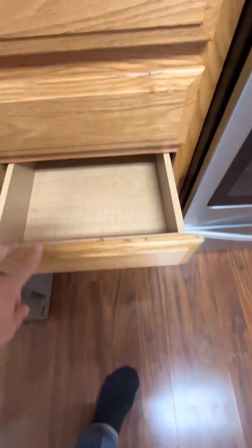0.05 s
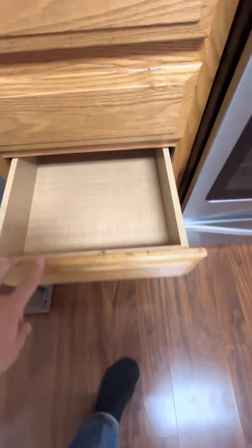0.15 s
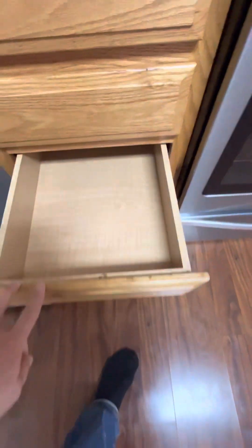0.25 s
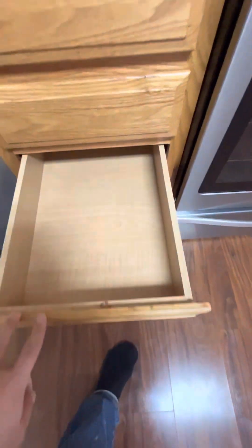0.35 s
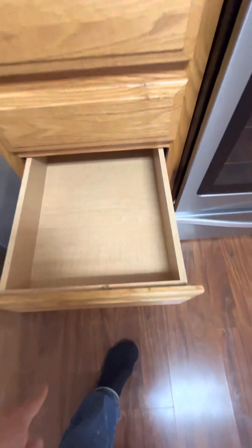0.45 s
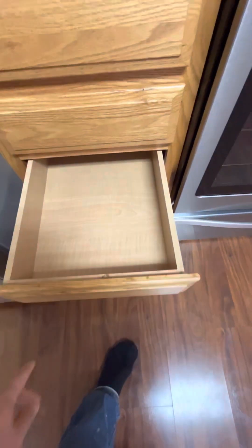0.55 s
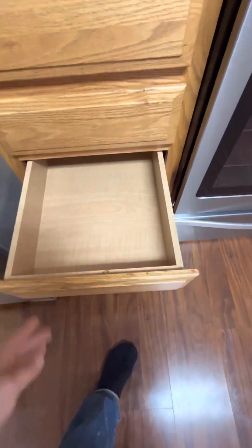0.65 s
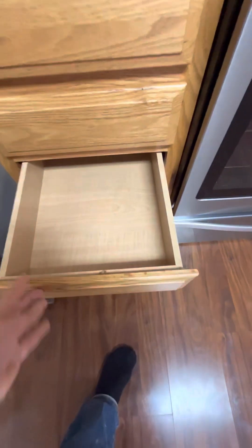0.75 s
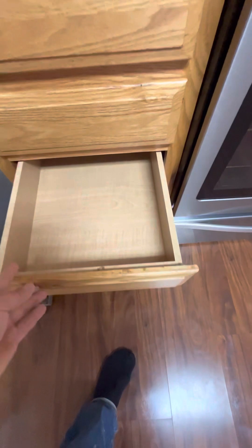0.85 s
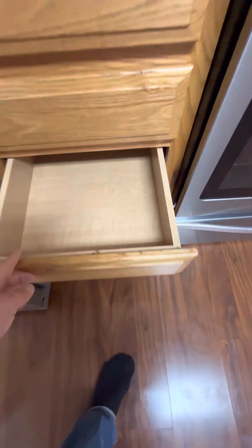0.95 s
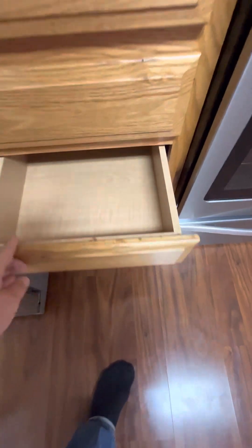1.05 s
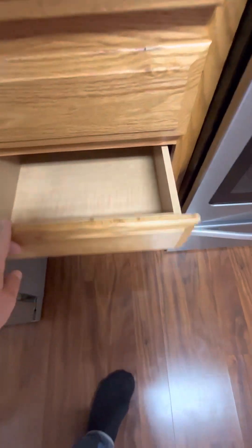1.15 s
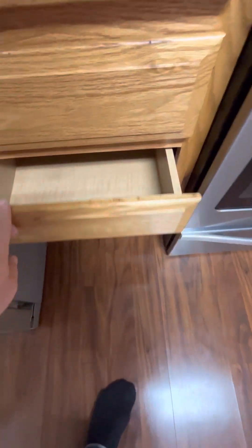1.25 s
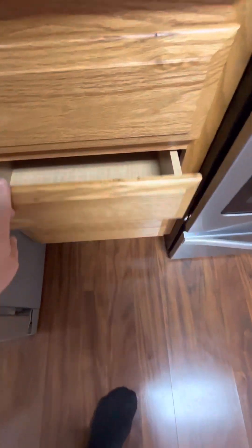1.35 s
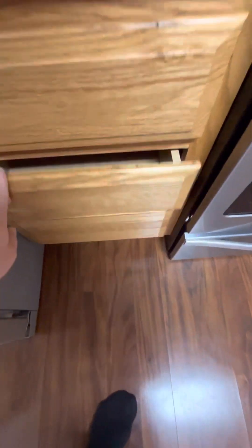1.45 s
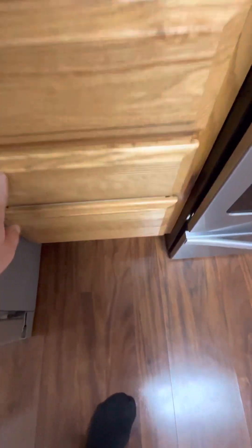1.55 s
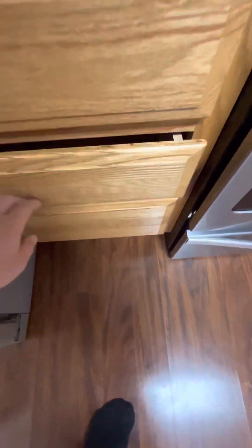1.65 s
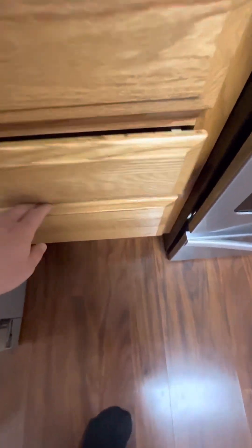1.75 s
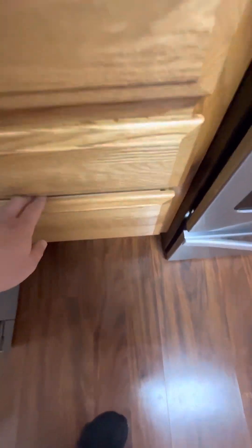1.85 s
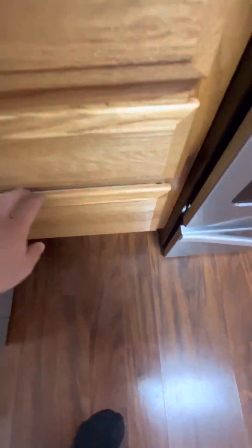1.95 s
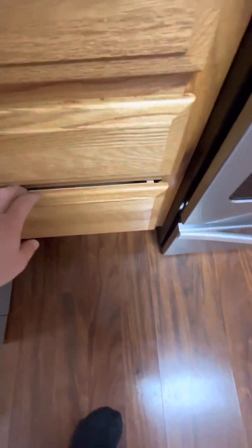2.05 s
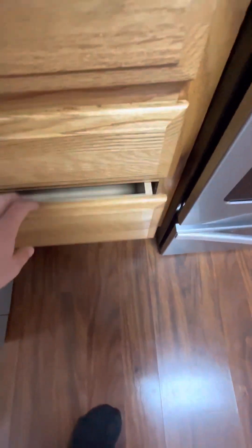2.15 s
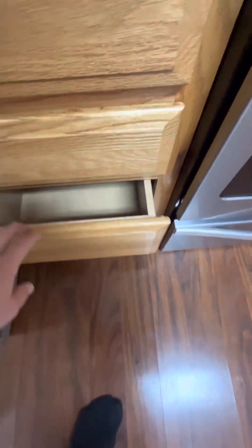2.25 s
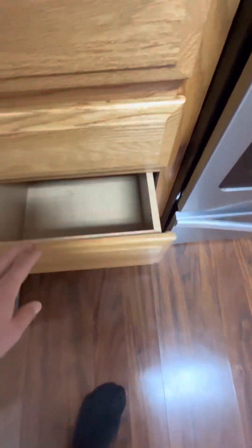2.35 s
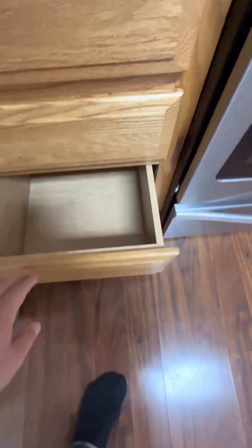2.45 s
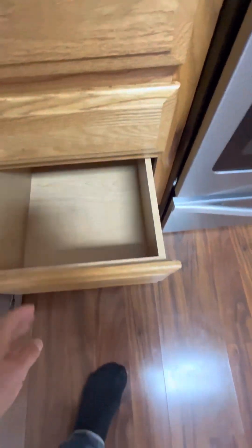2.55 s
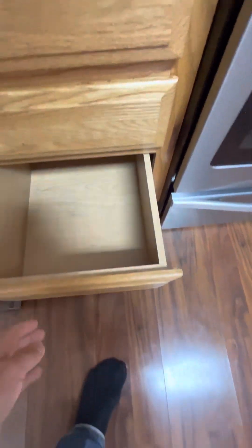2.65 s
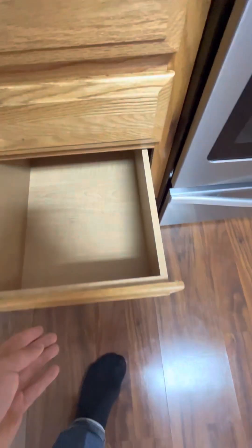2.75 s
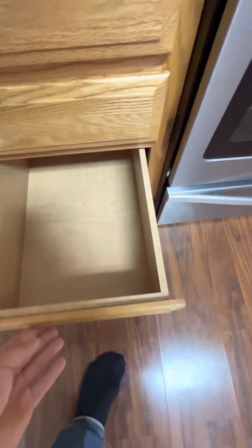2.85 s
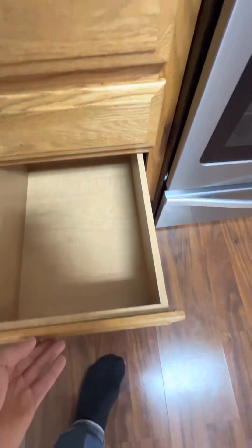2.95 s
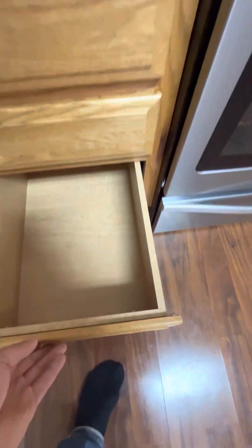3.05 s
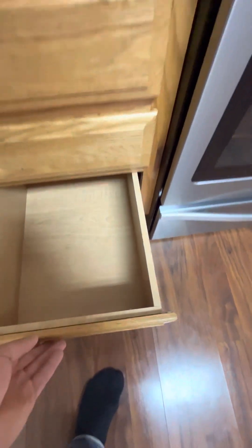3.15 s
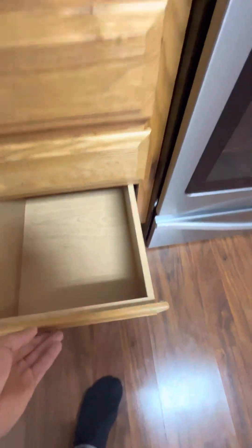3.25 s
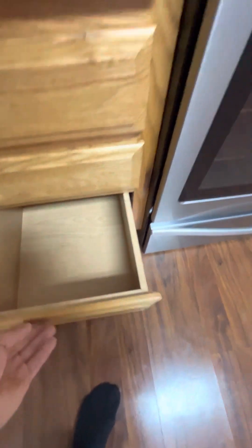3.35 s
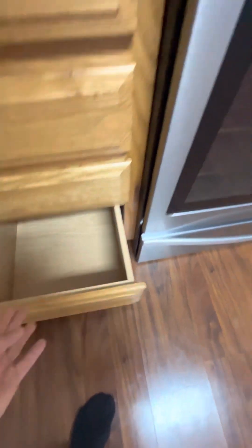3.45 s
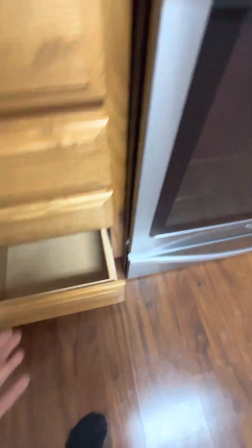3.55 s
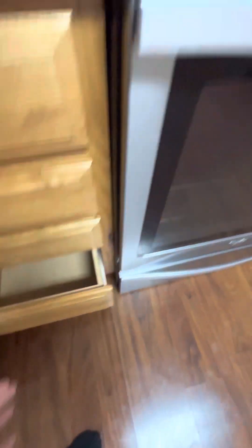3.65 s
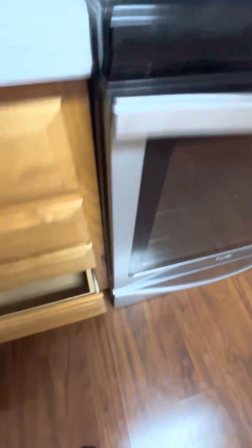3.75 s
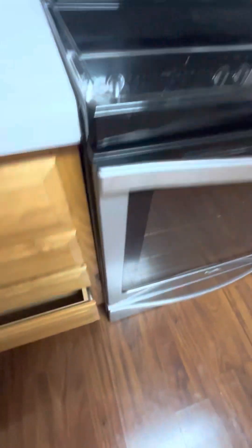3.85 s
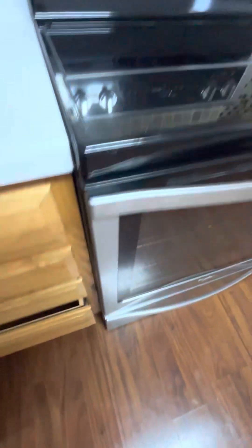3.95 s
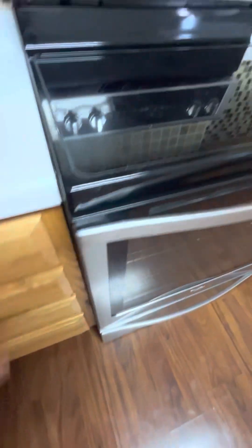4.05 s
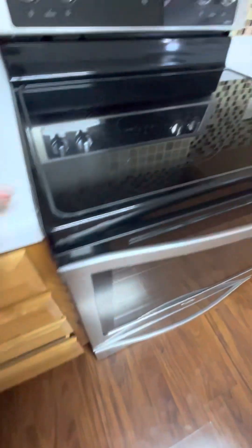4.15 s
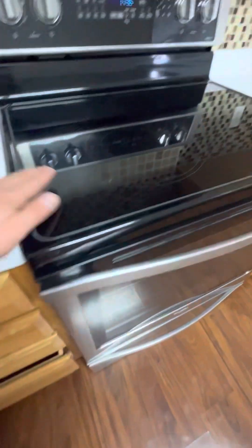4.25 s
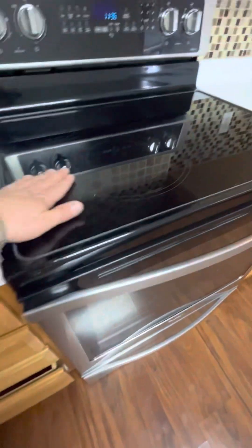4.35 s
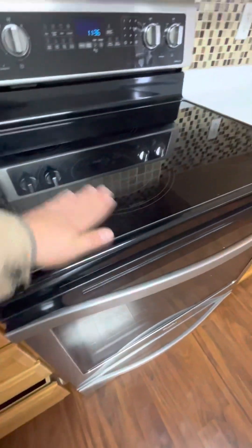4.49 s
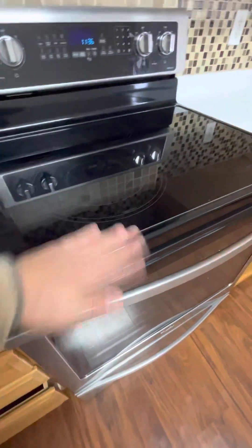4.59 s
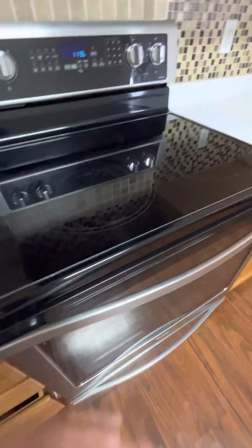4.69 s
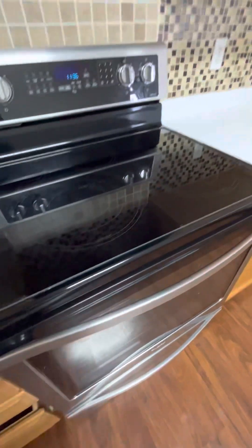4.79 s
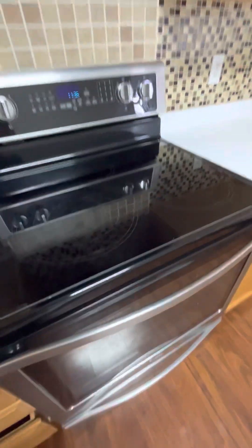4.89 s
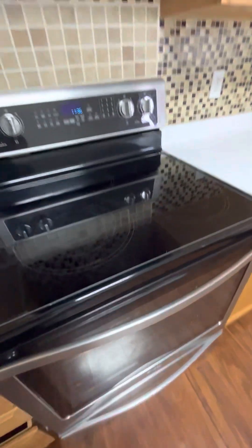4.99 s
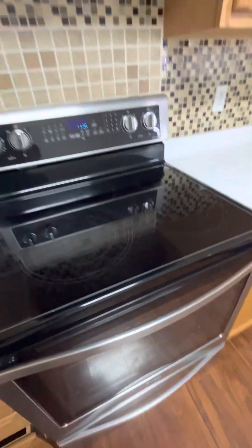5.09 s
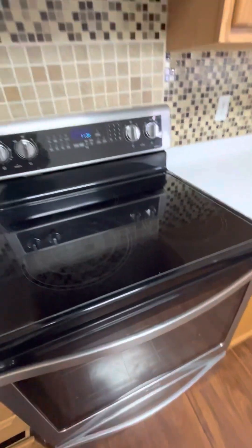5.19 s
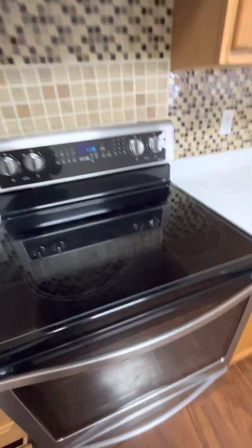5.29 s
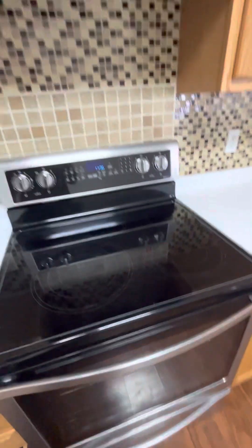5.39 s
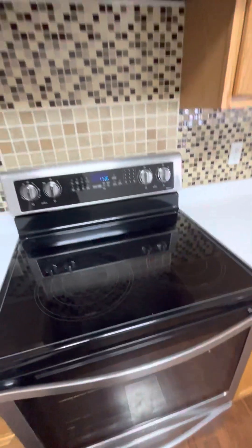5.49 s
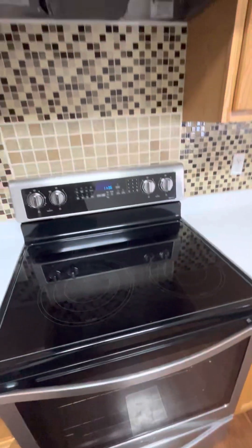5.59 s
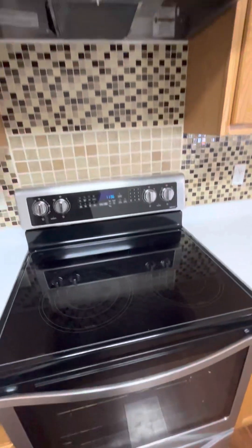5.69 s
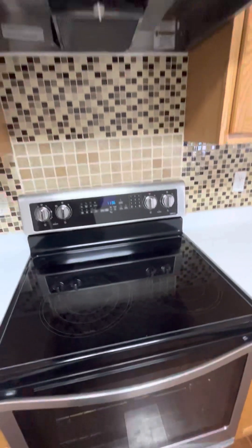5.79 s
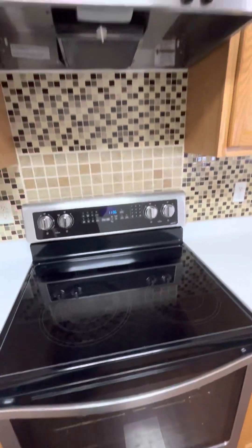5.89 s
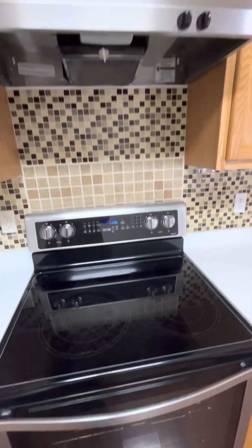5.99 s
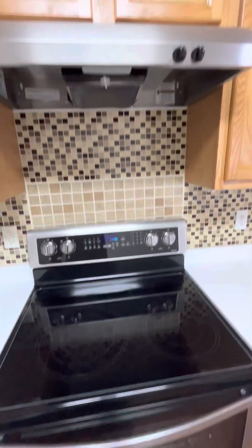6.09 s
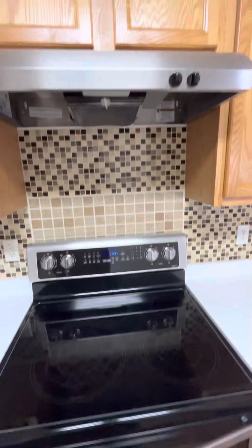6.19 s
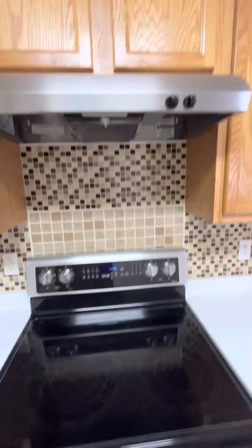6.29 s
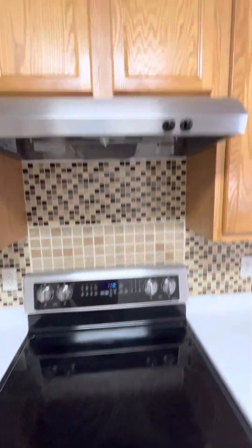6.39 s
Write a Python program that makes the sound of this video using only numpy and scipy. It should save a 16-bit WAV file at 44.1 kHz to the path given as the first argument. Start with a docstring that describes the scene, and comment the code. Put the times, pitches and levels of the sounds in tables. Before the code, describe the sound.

Close drawer rumble on rollers, a hard bang, clattering and a heavy slam, then a softer drawer roll, a soft bump and quiet kitchen.

```python
"""Two wooden kitchen drawers on roller runners are pulled out and pushed shut, close by.
The upper one bangs into its end stop, rattles and is slammed; the lower one is tugged open and rolls gently home.
A soft bump and some rustle follow in the quiet kitchen, and at the end the room tone rises briefly.
Rolling is filtered noise and a hum, impacts are dying noise clouds and damped modes;
room reflections and a hollow cupboard prolong them, and two microphone ports receive the whole."""
import sys
import numpy as np
from scipy import signal
from scipy.fft import rfft, irfft, next_fast_len
from scipy.io import wavfile
from scipy.ndimage import uniform_filter1d

SR = 44100
rng = np.random.default_rng(int(sys.argv[2]) if len(sys.argv) > 2 else 0)


def generate_wav(sig):
    """Save sig (samples, or channels by samples) to the path in sys.argv[1] as 16-bit PCM at SR."""
    pcm = np.round(np.clip(np.atleast_2d(sig).T, -1, 1) * 32767).astype(np.int16)
    wavfile.write(sys.argv[1], SR, pcm)


N = 283563
TIME = np.arange(N) / SR

# Strokes of each drawer, moved by a hand and then coasting: start_s, gather_speed_s, let_go_s, halt_s,
# slowing_db_per_s, box_rumble_db, roller_whirr_db, track_hiss_db
UPPER_STROKES = [(-.12, 0.11, 0.16, 0.5, 27.5, -32, -35, -44), (.37, 0.13, 0.67, 1.0, 24.5, -29, -35, -40),
                 (.99, 0.059, 1.42, 1.54, 36, -36, -41.5, -50.5)]
LOWER_STROKES = [(2.12, 0.13, 2.683, 3.1, 58, -39.5, -43, -52),
                 (3.07, 0.23, 3.33, 4.05, 14.2, -39.5, -41.5, -51)]
# Exponents of speed: rumble, whirr, hiss [no unit]
SPEED_POWERS = (0.67, 1, 1.16)
STOP_S = 0.025  # duration of a drawer's halt and of a hum's fade
# Hum of the rollers, one list a run: time_s, pitch_hz, level_db (relative to HUM_DB)
ROLLER_HUMS = [
    [(0.0, 296, -34), (0.04, 285, -23), (0.064, 278.5, -43), (0.086, 278.7, -24.5), (0.242, 302, -42),
     (0.274, 278.5, -25), (0.304, 277, -34), (0.34, 292, -37)],
    [(1.0, 292, -46), (1.104, 320.2, -24.5), (1.222, 293.4, -43), (1.262, 276, -25.5), (1.286, 282.7, -65),
     (1.394, 306.5, -30.5), (1.456, 284, -42), (1.52, 281.3, -25)],
    [(2.2, 313.7, -35.5), (2.404, 278.4, -39.5), (2.488, 311.4, -50), (2.604, 273.2, -35),
     (2.628, 271, -51), (2.642, 262.6, -35.5), (2.766, 275.5, -39), (2.88, 267, -51)],
    [(3.13, 265.4, -57), (3.19, 262.7, -45), (3.436, 314.8, -36.5), (3.506, 284, -51), (3.622, 314, -35),
     (3.846, 274, -48.5), (3.898, 340, -34), (4.02, 276.4, -54)],
]
HUM_DB = -7
HUM_WANDER_PER_S, HUM_WANDER_DB = 140, 0.8  # rate and depth of the pitch wander
BUMPS_PER_S, BUMPS_DB = 45, 1.8  # unevenness of the track
WHIRR_PATCHY_DB = 2.5
# Specks in the track: rate, level against the hiss, die-away time, spread of sizes
GRIT_PER_S, GRIT_DB, GRIT_DIE_S, GRIT_SPREAD_DB = 80, -1, 0.0018, 3.5

# Thin side walls clacking against the frame: start_s, level_db, centre_pitch_hz
CLACKS = [(.265, -28, 830), (0.274, -34.5, 940), (.397, -24, 1100), (.412, -24, 800), (.427, -26, 1300),
          (.516, -31, 1140), (.596, -29, 1200), (.604, -33, 1050), (.667, -37.5, 1160), (0.721, -31, 1080),
          (.768, -27, 1225), (.818, -29, 1330), (.912, -37, 1370), (1.024, -40.5, 1160), (1.379, -35, 1300),
          (1.396, -35.5, 715), (1.412, -46.5, 1370), (1.623, -36, 600), (1.638, -34, 530), (1.68, -34, 580),
          (1.727, -41, 1350), (1.736, -38.5, 540), (1.834, -27.5, 716), (2.043, -37, 1560),
          (2.144, -36.5, 950), (2.379, -37, 720), (2.471, -39, 754), (2.585, -38.5, 1550),
          (2.767, -37, 1620), (2.781, -48, 1520), (3.386, -42, 1350), (3.482, -49, 1610),
          (4.068, -35.5, 1070), (4.072, -39, 1500)]
CLACK_SPREAD_OCTAVES, CLACK_RISE_S = 0.25, 0.0007  # reach across the modes, speed of onset
# Cabinet or floor swinging under a blow: start_s, level_db, pitch_hz, time_to_peak_s,
# carcass_db (relative to the swing)
THUMPS = [(.28, -23.5, 89.4, 0.02, -0.5), (.367, -7, 105, 0.0093, -20), (.376, -24, 204, 0.0088, -8),
          (0.434, -21.5, 234.5, 0.012, -29), (1.378, -19, 93, 0.01, -9.5), (1.555, -6, 77, 0.0091, -4.5),
          (1.5425, -16, 265.6, .004, -19), (1.553, -16, 219, 0.0062, -34), (1.599, -18.5, 277, .016, -29),
          (1.617, -25, 288, .011, -28), (1.832, -26, 280, .012, 0), (1.851, -14.5, 70, 0.018, -1.5),
          (1.924, -26, 270, .012, -15), (1.91, -20, 93, 0.02, -7), (2.127, -26, 76, 0.015, -17),
          (2.228, -26.5, 53.7, 0.038, -21), (2.235, -25, 91, 0.025, -20), (2.393, -24.5, 76.5, 0.005, -12),
          (2.586, -25, 82, 0.0081, -30), (3.859, -31, 57, 0.048, -16), (4.049, -22, 77.7, 0.023, -30),
          (4.053, -26.5, 161.4, 0.0208, -28), (4.056, -27.5, 195, 0.015, -27),
          (4.313, -33.5, 96.5, 0.012, -11), (4.506, -44, 69.9, 0.019, -12), (4.575, -28.5, 80, 0.022, -24)]
WANDER_PER_S, CARCASS_WANDER_DB = 90, 0.4  # loose drawers detune the ringing carcass
# Wood striking wood: start_s, level_db, brightness_db_per_octave, die_away_s,
# panel_ring_db (relative to the blow), opening (0 shut to 1 open)
KNOCKS = [(0.356, -22.5, 9.5, 0.012, -18.5, 0.1), (0.3624, -1.5, 0, 0.0038, -20, 0.77),
          (.371, -6, -8, 0.027, -28, 0.3), (0.386, -16, 7.5, 0.0083, -17.5, 0),
          (0.4044, -18, 0.5, 0.005, -15, .5), (0.4178, -26.5, 3, 0.0046, -22, 0.5),
          (0.423, -20, -1, 0.0044, -27, 0.3), (0.4321, -22, 4, 0.0035, -18.5, 0.5),
          (0.472, -29.5, 9.5, 0.0041, -12, 0.5), (0.477, -27, 0.5, 0.0014, -18, 0.3),
          (0.586, -22, -4.5, 0.026, -4, 0.6), (.767, -24, -5.5, 0.0085, -23, 0.5),
          (1.531, -25, 1, 0.0077, -5.5, 0.3), (1.542, -5, 5, 0.0026, -3, 0.04),
          (1.556, -18.5, -1.5, 0.021, -29, 0.26), (1.599, -17, -9, 0.01, -36, 0),
          (1.831, -20, -9, 0.015, -22, 0.2), (1.865, -24.5, -5, 0.039, -1, 0.56),
          (2.14, -28.5, -7, 0.018, -18, 0.6), (4.044, -33, -6, 0.025, -22, 1),
          (4.0696, -25.5, -5.5, 0.0096, -19, 0.34), (4.505, -32.5, -19, 0.01, -25, 0.3),
          (4.586, -27, -9, 0.019, -10, 0.5)]
# Loose drawer scraping and chattering on its runners: start_s, level_db, length_s,
# brightness_db_per_octave, brokenness (0 smooth to 1 broken)
RATTLES = [(0.379, -23.5, 0.068, 0.5, 0.5), (0.41, -31.5, 0.04, 16.5, 0.48), (0.459, -34.5, 0.041, 2, 0.91),
           (0.575, -29.5, 0.034, 1.5, 0.78), (1.548, -33, 0.068, 4, 0.88), (1.838, -27, 0.071, 1, 0.13),
           (2.507, -39.5, 0.054, -2.5, 0.43), (2.551, -38, 0.058, -5, 0.53),
           (2.759, -44, 0.038, -3.5, 0.76), (4.557, -37, 0.051, -6.5, 0.52)]
# Collisions in a rattle: rate, decay as a share of the gap, spread of sizes either way
CHATTER_PER_S, CHATTER_DIE, CHATTER_SPREAD_DB = 170, 0.32, 5
RUB_PATCHY_DB = 2.5
# Upper drawer, thrown back from its end stop, rocking on its runners:
# start_s, level_db, brightness_db_per_octave, strongest_note_hz
ROCKS = [(.507, -16, 3.5, 3320), (0.5571, -19, 3, 5170), (0.6547, -22.5, 5, 2980),
         (0.7004, -24.5, 0.5, 5530), (0.7673, -26.5, 0.5, 1300), (0.814, -23, -2, 1430),
         (0.8511, -32, 4, 3260), (0.8924, -29, 1, 5150), (0.953, -33, -4.5, 3100), (1.0142, -31, -4, 1420),
         (1.0624, -42, -1, 1260)]
ROCK_SWING_DB, ROCK_SWING_FADE_DB_PER_S = -19.5, 44  # level of the first swing, and its steady decline
ROCK_LAG_S, ROCK_HZ, ROCK_RISE_S, ROCK_CARCASS_DB = 0.0073, 84, 0.016, -26
# Rollers clicking over track joints: start_s, level_db, brightness_db_per_octave, strongest_note_hz
CLICKS = [(.883, -38, 2, 3300), (.912, -38, -4, 1314), (1.178, -44, -3, 3330), (1.197, -49, -19, 1400),
          (1.2374, -30, 0.5, 3600), (1.3357, -43, 2, 3500), (1.3683, -30, 3, 2600), (1.438, -55, 2, 3041),
          (2.04, -33, -2, 1560), (2.1296, -31, -1, 2940), (2.379, -37.5, -3, 2860),
          (2.4443, -41, -0.5, 2720), (2.4693, -31.5, -2, 2080), (2.533, -38, 23, 3100),
          (2.5156, -46, -2, 3060), (2.5665, -33, -2.5, 2800), (2.587, -32, -3, 3070),
          (2.6608, -57, 0, 3000), (2.7092, -44, -3, 1608), (2.7625, -28.5, -2, 3620),
          (3.2799, -40.5, 2, 4940), (3.293, -43, -2, 4650), (3.3553, -33, -2.5, 4360),
          (3.389, -44, -1, 2980), (3.4795, -32, -1, 1620), (3.551, -49, -3, 3010), (3.579, -43, -1.5, 3520),
          (3.797, -44.5, 1, 6200), (3.845, -46.5, 0, 2850), (3.89, -50.5, 3, 2800)]
# Small contacts of hand and sleeve: start_s, level_db, brightness_db_per_octave, strongest_note_hz
TICKS = [(4.121, -37.5, -1.5, 4140), (4.571, -29, 1.5, 2860), (4.6937, -41, 13, 9000),
         (5.077, -50, -7, 1300), (5.104, -50.5, 10, 9400), (5.166, -50, -2, 2600),
         (6.0906, -44.5, -3, 1730)]
ROCK_DIE_S, CLICK_DIE_S, TICK_DIE_S = 0.0075, 0.01, 0.0034  # time constants of the contacts
# Resonances of a point of contact: frequency range, width, greatest height
SPOT_LOW_HZ, SPOT_HIGH_HZ, SPOT_WIDTH_HZ, SPOT_DB = 800, 9000, 55, 9
# Smooth swells of low rumble and soft rustle: movements of the person, and at the end
# a rise of the room tone: middle_s, half_length_s, rumble_db, rustle_db
SWELLS = [(2.987, 0.76, -65, -63.5), (4.227, 0.17, -46.5, -56.5), (4.567, 0.091, -40.5, -53),
          (4.88, 0.25, -49.5, -57), (5.203, 0.059, -66, -65), (6.363, 0.14, -59, -65)]
RUSTLE_PATCHY_DB = 2.5
# Hum and hiss of the still room: time_s, level_db
STILL_DB = [(5.3, -55.5), (5.95, -59.5), (6.25, -55.5)]

# Damped modes of drawer front, cabinet carcass, drawer side walls and hollow cupboard:
# pitch_hz, level_db, t60_s
PANEL = [(695, -12.5, .05), (798, 2, 0.043), (854, -11, 0.12), (1105, -18.5, 0.0082), (2114, -6, 0.024),
         (2410, -17.5, .035), (2776, -9, 0.045), (3100, -20.5, 0.017), (3500, -1.5, 0.0023),
         (3750, -1.5, .025), (4500, -6.5, 0.038), (4500, -8, 0.025), (5280, -7.5, 0.12)]
CARCASS = [(43.8, -13, 1), (68, -30.5, 0.31), (85.4, -8, 0.61), (131, -8.5, 0.23), (195, -3, 0.13),
           (258, -4.5, 0.26), (282.5, 1.5, 0.089), (336.6, -13, 0.22), (476, -14, 0.35), (541, -14.5, 0.32),
           (738, -15.5, 0.15)]
SIDES = [(530, 0.5, .09), (625, -1.5, .06), (704, -5, .07), (833, 1, .06), (938, -0.5, 0.087),
         (1077, -1, .07), (1230, -2, .06), (1271, -5, 0.073), (1368, -1, 0.062), (1430, -3.5, .05),
         (1593, 0, .08), (1720, -6, 0.031)]
CUPBOARD = [(416, -2, 0.45), (479, 1.5, .55), (534, -0.5, 0.72), (717, -1, 0.5), (795, 3, .5),
            (924, 1.5, 0.65), (1077, -3.5, .5), (1197, -10, 0.41), (1287, -8.5, .45), (1374, 0, 0.46),
            (2230, 1.5, .4), (2634, 0.5, 0.49), (2742, -4.5, .45), (2790, 2.5, .45), (3043, -8, .35)]
# Resonances of the two drawer boxes and of their steel tracks: pitch_hz, width_hz, height_db
UPPER_BOX = [(99, 27, 10.5), (253, 130, 11), (293, 3.5, -10), (336.6, 34, 8), (487, 42, 7.5),
             (566, 35, 8.5), (816, 17, 14.5), (946, 8.7, 5), (1193, 39, 8), (1334, 48, 9.5),
             (2035, 60, 7.5), (2820, 110, 10), (3090, 210, 7.5), (3894, 140, 6.5), (5040, 130, 4.5)]
LOWER_BOX = [(92.4, 27, 10.6), (240, 27, 7.7), (455, 16, 8.3), (614, 155, 6.7), (725, 38, 8.2),
             (867, 16, 6.5), (1352, 34, 9.9), (1560, 120, 4), (2760, 370, 6.2), (3050, 200, 5.5),
             (4100, 170, 4.5)]
UPPER_TRACK = [(3030, 90, -0.5), (3840, 250, -1), (3980, 70, 6.5), (4810, 90, 3.5), (5400, 600, 4),
               (5630, 70, 4.5), (7740, 320, 4.5)]
LOWER_TRACK = [(2330, 120, 2.1), (2740, 230, 2.3), (3670, 210, 0.67), (4020, 41, 2.4), (4360, 98, 4),
               (4870, 100, 2.9), (5950, 65, 1.6)]
# Relative noise spectra of each source: frequency_hz, density_db
WOOD = [(60, 3), (200, -4.5), (400, -1), (800, 0.5), (1400, -2), (2100, -7.5), (3200, -2), (4500, -10.5),
        (6500, -16), (9000, -25.5), (13000, -40)]
RUNNER = [(100, 11), (500, 7.5), (900, 1.5), (1450, 6), (2200, 1.5), (3200, 10.5), (4200, 6), (5500, 3),
          (7000, 5.5), (9000, -6), (13000, -20)]
RUMBLE = [(25, -57), (50, 4), (90, 0.5), (160, -1.5), (300, -6.5), (420, -11.5), (700, -53)]
WHIRR = [(200, -17.5), (420, -2.5), (700, -4), (1000, -7), (1400, -12.5), (2200, -21), (5000, -53.5)]
HISS = [(700, -25.5), (1600, 11.5), (2200, 6.5), (3200, 11), (4200, 9.5), (5500, 8.5), (7000, 5),
        (9000, -6.5), (13000, -18.5)]
LOW_RUMBLE = [(25, 3.5), (50, 1.5), (85, -1.5), (150, -16.5), (300, -14), (700, -21), (1500, -29.5),
              (4000, -49)]
STILL = [(25, -8), (50, -1), (100, 6.5), (180, -1), (300, 5), (450, -6), (660, -7.5), (780, 1), (900, -8),
         (2000, -14.5), (5500, -14), (8000, -19.5), (13000, -34)]
# Reverberation time of the kitchen: frequency_hz, t60_s
ROOM = [(60, 0.93), (180, 0.71), (400, 1), (800, 0.43), (1300, 0.92), (3000, 0.71), (7000, 0.5),
        (13000, 0.44)]
PANEL_ECHO_DB = -17  # little of the panel's note reaches the room
EVEN_HZ, ROOM_EVEN_HZ = 200, 30  # bandwidths over which a contact and the room are even
# Likeness of noise at the two microphone ports: frequency_hz, likeness (0 to 1)
LIKENESS = [(200, 1), (320, .98), (550, .6), (850, .33), (1500, .35), (3000, .45), (6000, .78), (8000, .88),
            (13000, .92)]
# Level of the left port over the right: frequency_hz, difference_db
LEAN = [(150, 0), (300, 1), (550, 3.5), (820, 9.5), (1250, 8.5), (1800, 3), (2700, -1), (6000, -.7),
        (13000, 0)]
# Phase lead of the left port over the right: frequency_hz, lead_radians
LEAD = [(130, 0), (300, -.1), (600, 0), (1250, -1), (2700, -1.7), (4000, -2.3), (6300, -3.0), (8500, -1.8),
        (11500, -.7)]
EDGE_HZ = 13900  # upper band limit


def amp(db):
    """Logarithmic level: converts decibels to an amplitude ratio."""
    return 10 ** (np.asarray(db) / 20)


def unit(x):
    """Power normalisation: scales to rms 1."""
    return x / np.sqrt(np.mean(x ** 2) + 1e-20)


def read(points, hz):
    """Logarithmic pitch scale: interpolates a table along log frequency."""
    f, value = np.transpose(points)
    return np.interp(np.log(hz + 1), np.log(f), value)


def add(mix, s, sound):
    """Superposition: sums a sound into the mix from time s."""
    part = mix[:, max(round(s * SR), 0):][:, :sound.shape[-1]]
    part += sound[..., :part.shape[1]]


def noise(size):
    """Partial coherence: white noise shared by the two ports according to LIKENESS."""
    padded = next_fast_len(size)
    left, other = rfft(rng.standard_normal((2, padded)))
    same = np.clip(read(LIKENESS, np.linspace(0, SR / 2, len(left))), 0, 1)
    right = same * left + np.sqrt(1 - same ** 2) * other
    return irfft(np.array([left, right]), padded)[:, :size]


def colour(x, spectrum, tilt_db=0, peaks=(), size=4096):
    """Minimum-phase filtering: unit-power taps from a spectrum, a tilt per octave and resonances."""
    hz = np.fft.rfftfreq(size, 1 / SR)
    db = read(spectrum, hz) + tilt_db * np.log2(np.maximum(hz, 250))  # no tilt below 250 Hz
    for f, width, height in peaks:
        db = db + height / (1 + (2 * (hz - f) / width) ** 2)
    # folding the cepstrum onto positive time makes the filter causal
    cepstrum = irfft(np.log(amp(db)))
    cepstrum[1:size // 2] *= 2
    cepstrum[size // 2 + 1:] = 0
    taps = irfft(np.exp(rfft(cepstrum)))
    return signal.oaconvolve(x, taps[None] / np.linalg.norm(taps), axes=1)[:, :x.shape[1]]


def flutter(size, per_s, depth_db):
    """Random modulation: a gain of unit power with per_s new values a second."""
    steps = rng.standard_normal(4096)
    position = np.arange(size) / SR * per_s % 4095
    return unit(amp(depth_db * np.interp(position, np.arange(4096), steps)))


def ring(modes, t, wander_db=0):
    """Modal decay: a struck body sounds as dying sines, whose pitch may wander."""
    total = 0
    for hz, db, t60 in modes:
        seconds = np.cumsum(flutter(len(t), WANDER_PER_S, wander_db)) / SR
        total = total + amp(db - 60 * t / t60) * np.sin(2 * np.pi * hz * seconds)
    return total


def levelled(x, width_hz):
    """Spectral whitening: evens out a burst's energy over its spectrum."""
    z = rfft(x, 2 * x.shape[1])
    bins = max(round(width_hz * 2 * x.shape[1] / SR), 1)
    power = uniform_filter1d((abs(z) ** 2).mean(0), size=bins)
    return irfft(z * np.sqrt(power.mean() / np.maximum(power, 1e-12)))[:, :x.shape[1]]


def burst(die, size=6000, rise=0.00058):
    """Impulsive excitation: a contact's dense cloud of vibration builds at once and dies quickly."""
    t = np.arange(size) / SR
    return levelled(noise(size) * np.exp(-t / die) * (1 - np.exp(-t / rise)), EVEN_HZ)


def waver(x, patchy_db, frame_size=512):
    """Shifting excitation point: neighbouring modes swell and fade in turn."""
    z = signal.stft(x, SR, nperseg=frame_size)[2]
    patches = rng.standard_normal(z.shape[1:])
    patches = uniform_filter1d(patches, size=6, axis=1)
    patches = unit(uniform_filter1d(patches, size=4, axis=0))
    gain = unit(amp(np.clip(patchy_db * patches, -8, 5)))
    return signal.istft(z * gain, SR, nperseg=frame_size)[1][:, :x.shape[1]]


def contact_modes(count=26):
    """Local resonance: each point of contact brings out its own narrow peaks."""
    places = (np.arange(count) + rng.random(count)) / count
    hz = SPOT_LOW_HZ * (SPOT_HIGH_HZ / SPOT_LOW_HZ) ** (places ** 0.7)  # denser towards the treble
    return [(f, SPOT_WIDTH_HZ, SPOT_DB * rng.uniform(0.4, 1)) for f in hz]


def box(s):
    """Body resonance: peaks of the drawer box in use at time s."""
    return UPPER_BOX if s < LOWER_STROKES[0][0] else LOWER_BOX


def track(s):
    """Structural resonance: peaks of the steel track in use at time s."""
    return UPPER_TRACK if s < LOWER_STROKES[0][0] else LOWER_TRACK


def stroke(start, gather, let_go, halt, slowing_db, *layers_db):
    """Speed-dependent radiation: rumble, whirr and hiss follow a drawer's push, coast and halt."""
    push = np.sin(np.pi / 2 * np.clip((TIME - start) / gather, 0, 1)) ** 2
    coast = amp(-slowing_db * np.maximum(TIME - let_go, 0))
    speed = push * coast * np.clip((halt - TIME) / STOP_S + 1, 0, 1)
    return np.array([amp(db) * speed ** power for db, power in zip(layers_db, SPEED_POWERS)])


def specks():
    """Random impulse process: rollers over dirt give sparse tiny ticks of uneven size."""
    chance = rng.random(N)
    size = np.minimum(rng.exponential(1, N), 3)
    train = (chance < GRIT_PER_S / SR) * amp(GRIT_SPREAD_DB * size)
    energy = signal.lfilter([1], [1, -np.exp(-2 / (GRIT_DIE_S * SR))], train ** 2)
    ticks = waver(noise(N) * np.sqrt(energy), patchy_db=-2.5)
    return unit(colour(ticks, RUNNER, tilt_db=-4.0))


def rolling(strokes, peaks):
    """Roughness excitation: rollers on an uneven, gritty track shake their hollow drawer box."""
    rumble, whirr, hiss = sum(stroke(*row) for row in strokes)
    bumps = flutter(N, BUMPS_PER_S, BUMPS_DB)
    shake = colour(noise(N), RUMBLE, peaks=peaks)
    turn = colour(waver(noise(N) * bumps, WHIRR_PATCHY_DB, frame_size=1024), WHIRR, peaks=peaks)
    scrape = colour(waver(noise(N) * bumps, patchy_db=3.0), HISS, peaks=peaks)
    return rumble * shake + whirr * turn + hiss * (scrape + amp(GRIT_DB) * specks())


def hum(curve):
    """Periodic excitation: the turning rollers hum through the box on one unsteady note."""
    s, hz, db = np.transpose(curve)
    pitch = np.interp(TIME, s, hz) * flutter(N, HUM_WANDER_PER_S, HUM_WANDER_DB)
    fade = np.clip(np.minimum(TIME - s[0], s[-1] - TIME) / STOP_S + 0.5, 0, 1)
    tone = unit(np.sin(2 * np.pi * np.cumsum(pitch) / SR))
    return amp(HUM_DB + np.interp(TIME, s, db)) * fade * tone


def still_air():
    """Stationary noise: the room's hum and hiss at a slowly varying level."""
    level = amp(np.interp(TIME, *np.transpose(STILL_DB)))
    return level * colour(noise(N), STILL)


def clacks(size=8000):
    """Selective modal excitation: a clack rings the side-wall modes near its pitch, with alternate signs."""
    out, t = np.zeros((2, N)), np.arange(size) / SR
    for s, db, hz in CLACKS:
        walls = 0
        for k, mode in enumerate(SIDES):
            octaves = np.log2(mode[0] / hz)
            share = (-1) ** k * np.exp(-(octaves / CLACK_SPREAD_OCTAVES) ** 2)
            walls = walls + share * ring([mode], t)
        add(out, s, amp(db) * walls * (1 - np.exp(-t / CLACK_RISE_S)))
    return out


def thumps(rows, size=30000):
    """Inertial response: the heavy cabinet answers late with a few low swings, then its carcass rings."""
    out, t = np.zeros((2, N)), np.arange(size) / SR
    for s, db, hz, rise, carcass_db in rows:
        envelope = (t / rise) ** 2 * np.exp(2 * (1 - t / rise))
        swing = envelope * np.cos(2 * np.pi * hz * (t - rise))
        carcass = ring(CARCASS, t, CARCASS_WANDER_DB) * (1 - np.exp(-t / 0.0039))
        add(out, s, amp(db) * (swing + amp(carcass_db) * carcass))
    return out


def knocks(size=12000):
    """Impact excitation: blows raise wood noise, coloured by an open box, and separate panel notes."""
    cracks, notes, t = np.zeros((2, N)), np.zeros((2, N)), np.arange(size) / SR
    for s, db, tilt_db, die, panel_db, opening in KNOCKS:
        hollow = np.array(box(s)) * [1, 1, np.clip(opening, 0, 1)]  # opening scales the peak heights
        cloud = burst(die, size=size, rise=0.15 * die)
        add(cracks, s, amp(db) * colour(cloud, WOOD, tilt_db, list(hollow) + contact_modes()))
        add(notes, s, amp(db + panel_db) * ring(PANEL, t) * (1 - np.exp(-t / 0.0006)))
    return cracks, notes


def rattles(size=8000):
    """Intermittent friction: scraping on the track breaks up into uneven collisions."""
    out, t = np.zeros((2, N)), np.arange(size) / SR
    for s, db, length, tilt_db, broken in RATTLES:
        swell = np.sqrt(abs(np.sin(np.pi * np.minimum(t / length, 1))))
        turns = np.cumsum(CHATTER_PER_S * flutter(size, CHATTER_PER_S, depth_db=4)) / SR
        sizes = amp(CHATTER_SPREAD_DB * rng.uniform(-1, 1, 256))
        hits = np.exp(-(turns % 1) / CHATTER_DIE) * sizes[turns.astype(int) % 256]
        chatter = unit(hits ** np.clip(broken, 0, 1))
        rub = waver(levelled(noise(size) * swell * chatter, EVEN_HZ), RUB_PATCHY_DB)
        add(out, s, amp(db) * colour(rub, RUNNER, tilt_db, track(s) + contact_modes()))
    return out


def rocking():
    """Damped oscillation: thump rows for the rocking drawer's low swings, fading from the first rock."""
    swings = []
    for s, *_ in ROCKS:
        level_db = ROCK_SWING_DB - ROCK_SWING_FADE_DB_PER_S * (s - ROCKS[0][0])
        swings.append((s + ROCK_LAG_S, level_db, ROCK_HZ, ROCK_RISE_S, ROCK_CARCASS_DB))
    return swings


def clicks(rows, die, note_db=8, note_share=0.12):
    """Resonant impact: light single contacts, each with one note that stands out."""
    out = np.zeros((2, N))
    for s, db, tilt_db, hz in rows:
        note = (hz, note_share * hz, note_db)
        peaks = [note] + track(s) + contact_modes()
        add(out, s, amp(db) * colour(burst(die), RUNNER, tilt_db, peaks))
    return out


def swells():
    """Amplitude modulation: smooth bells raise low rumble and soft rustle out of filtered noise."""
    rumble, rustle = 0, 0
    for s, half, rumble_db, rustle_db in SWELLS:
        bell = np.exp(-((TIME - s) / half) ** 2)
        rumble = rumble + amp(rumble_db) * bell
        rustle = rustle + amp(rustle_db) * bell
    soft_hiss = colour(waver(noise(N), RUSTLE_PATCHY_DB), HISS, tilt_db=1.5)
    return rumble * colour(noise(N), LOW_RUMBLE) + rustle * soft_hiss


def kitchen(x, size=30000):
    """Diffuse reverberation: floor and cupboards reflect evenly, with decay times set by ROOM."""
    z = signal.stft(noise(size), SR, nperseg=2048)[2]
    even = z / np.sqrt((abs(z) ** 2).mean(0) + 1e-20)
    air = signal.istft(even, SR, nperseg=2048)[1]
    hz, t, z = signal.stft(air, SR, nperseg=256)
    decay = amp(-60 * t / read(ROOM, hz)[:, None])
    tail = signal.istft(z * decay, SR, nperseg=256)[1]
    tail *= 1 - np.exp(-(np.arange(tail.shape[1]) / SR / 0.0013) ** 2)  # reflections build up smoothly
    tail = levelled(tail, ROOM_EVEN_HZ)
    return signal.fftconvolve(x, tail / np.linalg.norm(tail[0]), axes=1)[:, :N]


def cupboard(x, size=30000):
    """Cavity resonance: blows leave the hollow cupboard ringing on its own notes."""
    notes = ring(CUPBOARD, np.arange(size) / SR)
    return signal.fftconvolve(x, notes[None] / np.linalg.norm(notes), axes=1)[:, :N]


def scene():
    """Superposition of direct sound, echo, cupboard resonance and the still air of the kitchen."""
    rolls = rolling(UPPER_STROKES, UPPER_BOX) + rolling(LOWER_STROKES, LOWER_BOX)
    rolls = rolls + sum(hum(curve) for curve in ROLLER_HUMS)
    walls = clacks()
    low = thumps(THUMPS + rocking())
    wood, notes = knocks()
    runners = rattles() + clicks(ROCKS, ROCK_DIE_S)
    runners = runners + clicks(CLICKS, CLICK_DIE_S) + clicks(TICKS, TICK_DIE_S)
    blows = amp(-7.0) * wood + amp(PANEL_ECHO_DB) * notes + amp(-10) * low + amp(-13) * walls
    echo = kitchen(blows) + kitchen(amp(-12.5) * runners)
    hollow = cupboard(amp(-25) * wood + amp(-25.5) * runners)
    return wood + notes + walls + low + runners + hollow + echo + rolls + swells() + still_air()


def record(dry):
    """Two-port reception: level and phase differ between ports, then soft overload and band limits."""
    size = next_fast_len(N + 4096)
    hz = np.fft.rfftfreq(size, 1 / SR)
    halves = np.array([[0.5], [-0.5]])  # each difference is split between left and right
    lean = amp(read(LEAN, hz) * halves)
    ports = lean / np.sqrt(np.mean(lean ** 2, 0)) * np.exp(1j * read(LEAD, hz) * halves)
    heard = irfft(rfft(dry, size) * ports, size)[:, :N]
    heard = signal.sosfilt(signal.butter(8, 37, "high", fs=SR, output="sos"), heard)
    heard = heard / (1 + (heard / 0.85) ** 6) ** (1 / 6)  # the loudest peaks are rounded off
    lowpass = signal.firwin(255, EDGE_HZ, window=("kaiser", 9), fs=SR)
    return signal.oaconvolve(heard, lowpass[None], "same")


dry = scene()
out = record(dry)
generate_wav(out)
```